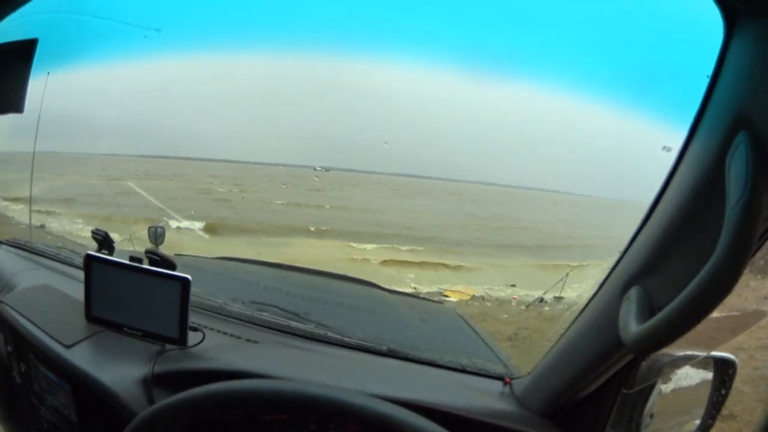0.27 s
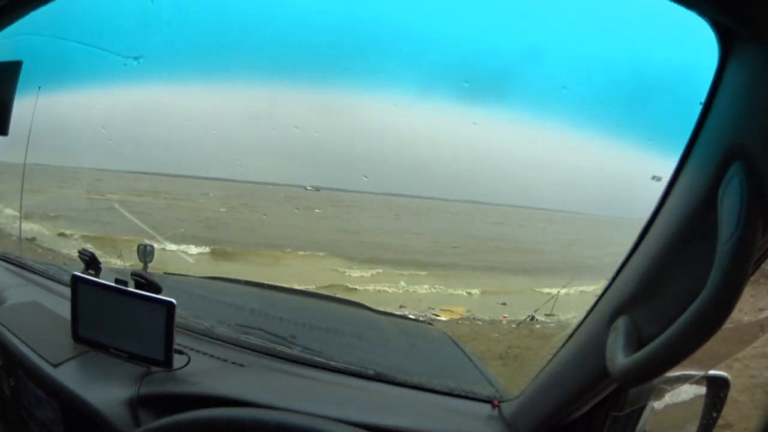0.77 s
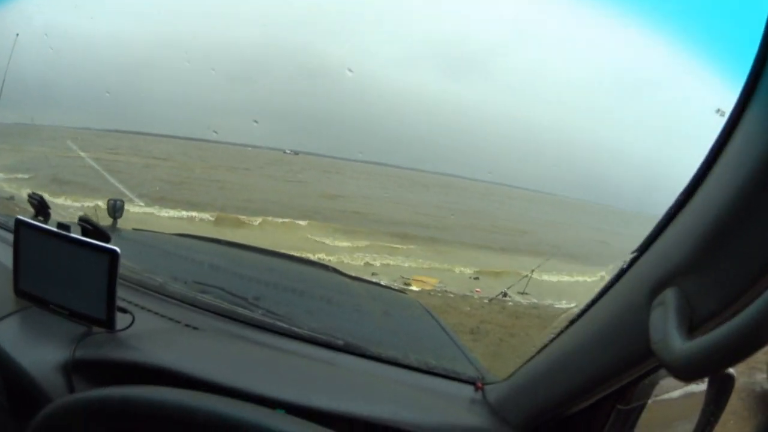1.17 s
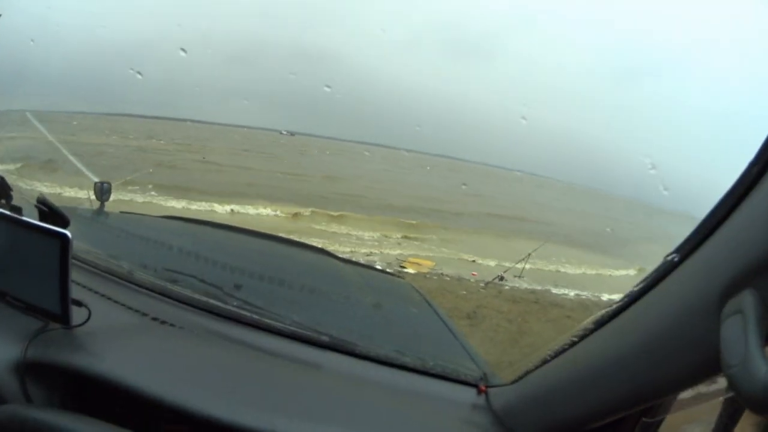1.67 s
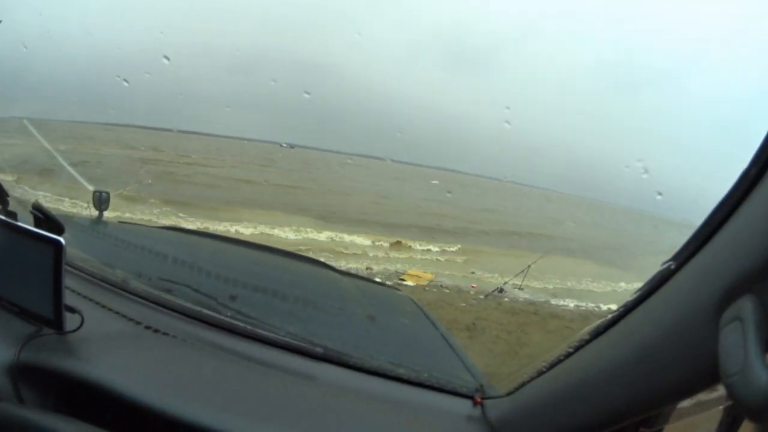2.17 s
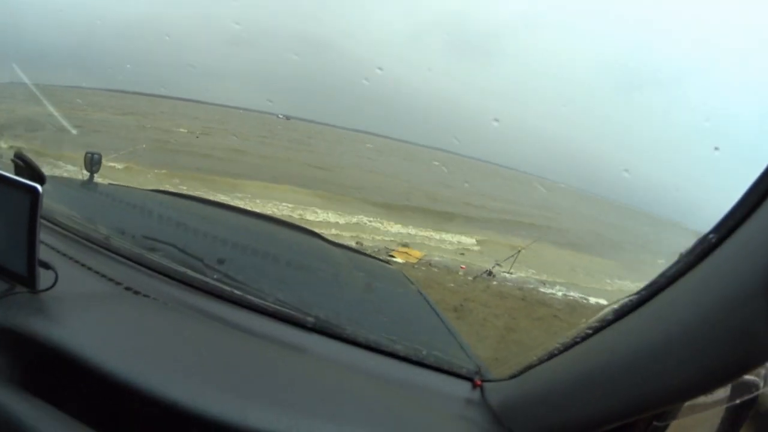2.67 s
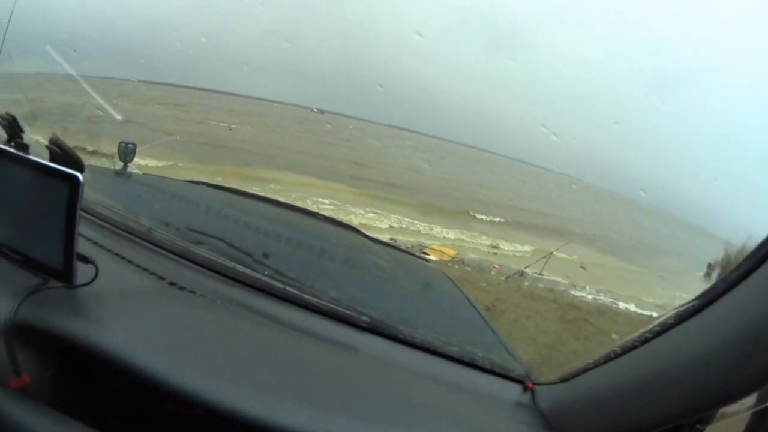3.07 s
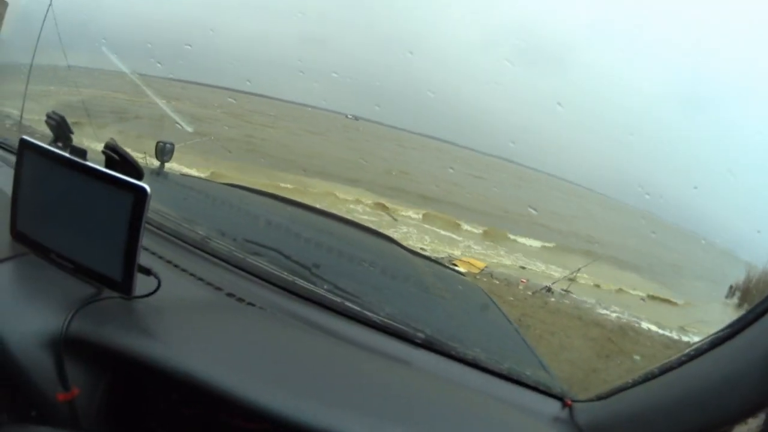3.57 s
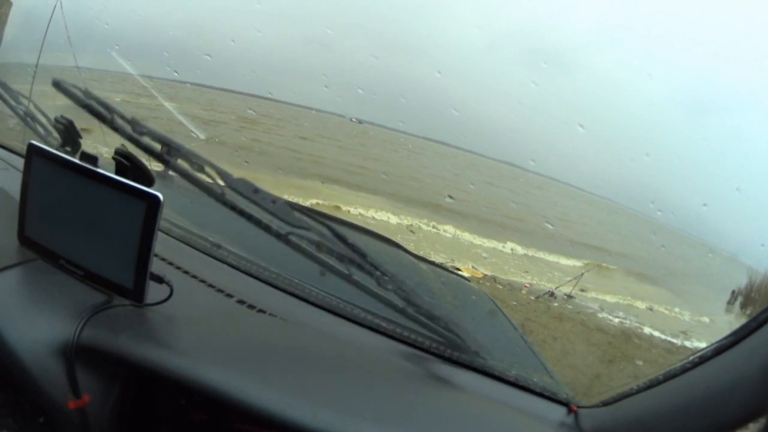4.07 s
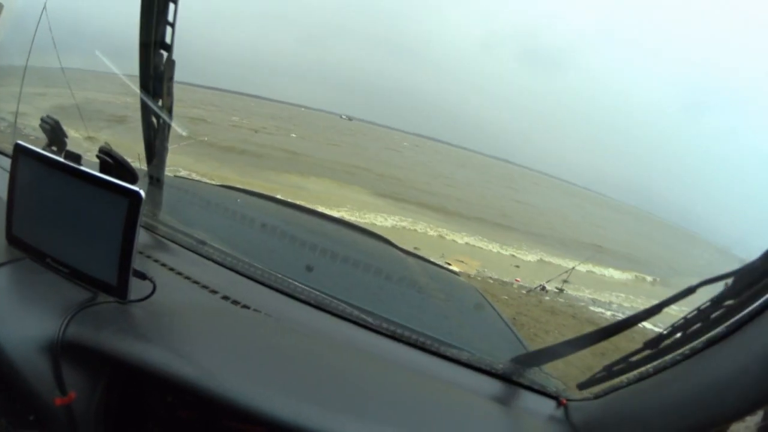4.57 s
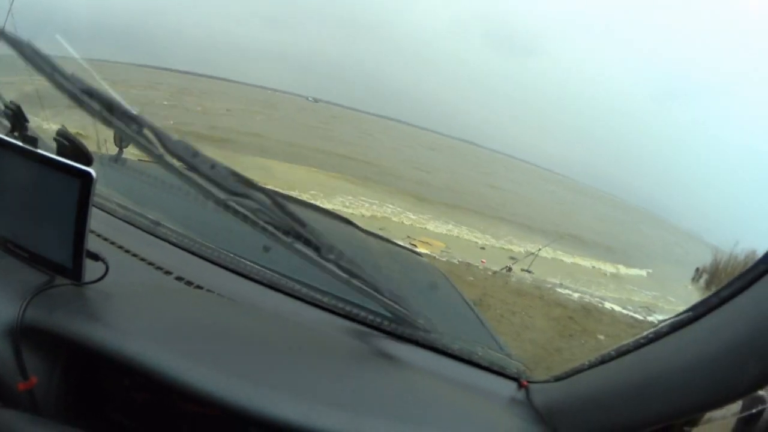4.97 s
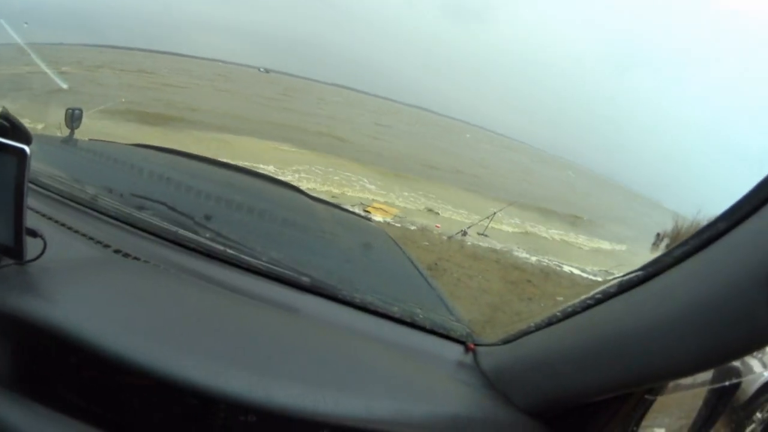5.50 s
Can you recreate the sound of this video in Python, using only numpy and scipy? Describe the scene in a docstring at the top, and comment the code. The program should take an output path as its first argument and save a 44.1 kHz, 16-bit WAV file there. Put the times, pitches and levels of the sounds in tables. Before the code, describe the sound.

Inside an idling car in wind and spray, fingers knock and rub the handheld camera before wipers swish once across and back with a hard clack.

```python
"""Idling car on a stormy shore

Heard from the driver's seat. Gusts drive spray against the glass as filtered noise and tiny impacts;
single drops tick on it as short noise bursts, over an idle of low harmonics and a booming cabin.
Fingers knock and rub on the hand-held camera, whose ringing case lies right beside the microphones.
Near the end the wipers sweep once out and back: stick-slip swishes, and struck modes that clack at the turn."""
import sys
import numpy as np
from scipy import signal
from scipy.fft import rfft, irfft
from scipy.io import wavfile
from scipy.ndimage import uniform_filter1d

SR = 44100
rng = np.random.default_rng(int(sys.argv[2]) if len(sys.argv) > 2 else 0)


def wav_out(sig):
    """Save sig, one row per channel (or a flat mono array), as 16-bit PCM at SR to the path in sys.argv[1]."""
    wavfile.write(sys.argv[1], SR, np.round(np.clip(np.atleast_2d(sig).T, -1, 1) * 32767).astype(np.int16))


N = 253134
T = np.arange(N) / SR  # time through the scene [s]
AGE = T[:SR // 4]  # time since a single blow [s]


def undb(db):
    """Decibels to gain."""
    return 10 ** (np.asarray(db) / 20)


def curves(table):
    """Each column of a timed table, interpolated at every sample."""
    s, *columns = np.transpose(table)
    return [np.interp(T, s, column) for column in columns]


def unit(x):
    """Scale to rms 1."""
    return x / np.sqrt(np.mean(x ** 2))


def colour(x, points):
    """Filter by a (frequency [Hz], level [dB]) outline; the result has rms 1."""
    hz, db = np.transpose(points)
    bins = np.maximum(np.fft.rfftfreq(N, 1 / SR), 1)
    outline_db = np.interp(np.log(bins), np.log(hz), db)
    return unit(irfft(rfft(x) * undb(outline_db), N))


def band(x, lo_hz, hi_hz):
    """Causal band-pass."""
    return signal.sosfilt(signal.butter(2, [lo_hz, hi_hz], "band", fs=SR, output="sos"), x)


def walk(rate):
    """Smoothed random wander of rms 1; rate is in new values per second."""
    k = int(SR / rate)
    steps = np.repeat(rng.standard_normal(N // k + 2), k)
    smooth = uniform_filter1d(uniform_filter1d(steps, k), k)
    return unit(smooth[:N])


def grains(rate, spread_db):
    """Two unrelated streams of tiny impacts, rate per second, a few much larger than the rest."""
    sizes = undb(spread_db * np.minimum(rng.exponential(size=(2, N)), 5))
    landed = rng.random((2, N)) < rate / SR
    return unit(landed * sizes * rng.choice([-1, 1], (2, N)))


def stereo(pair, side_db, left_db):
    """Mid and side to left and right microphones, balanced for power; left_db tilts to the left."""
    mid, side = pair[0], undb(side_db) * pair[1]
    both = np.array([mid + side, mid - side]) / np.sqrt(1 + undb(side_db) ** 2)
    return both * undb(np.array([[left_db], [-left_db]]) / 2)


def ring(modes, scatter):
    """Struck modes, neighbours in opposite sign, as mid and side; every blow is detuned a little."""
    hz, db, t60 = np.transpose(modes)[:, :, None]
    detune, lead = rng.standard_normal((2, len(modes), 1))
    sign = (-1) ** np.arange(len(modes))[:, None]
    fade = sign * undb(db - 60 * AGE / t60)
    z = fade * np.exp(2j * np.pi * hz * (1 + scatter * detune) * AGE)
    # each mode leans towards one microphone just after the onset
    side = np.sign(lead) * (1 - np.exp(-AGE * hz)) * z.real
    return np.array([z.imag.sum(0), side.sum(0)])


def add(out, s, sound, db):
    """Mix in a short sound; db is its level over 20 ms."""
    start = int(s * SR)
    sound = sound * undb(db) * np.sqrt(2 * .02 * SR / np.sum(sound ** 2))
    out[:, start:start + len(AGE)] += sound[:, :N - start]


# wind on the glass: (time [s], relative level [dB])
GUST = [(0.0, -55), (0.29, -55), (0.64, -58), (0.88, -58), (1.16, -51), (1.37, -52), (1.89, -57),
        (2.18, -57), (2.34, -56), (2.63, -51), (2.91, -53), (3.12, -52), (3.28, -50), (3.74, -50),
        (3.98, -54), (4.16, -54), (5.08, -50), (5.34, -50), (5.54, -53), (5.72, -53)]
# spray heard through the glass: (frequency [Hz], level [dB])
SPRAY = [(400, -14), (700, -4), (1050, 0.5), (1300, 11), (1550, 0.5), (1800, 4), (2200, -3), (2700, 8.5),
         (3700, -1), (4600, 0), (5400, -2), (5900, -0.5), (7000, -11), (11000, -38)]
# wind booming in the cabin: (frequency [Hz], level [dB])
BOOM = [(15, -9), (40, 3.5), (100, -3.5), (170, -3), (300, -6.5), (480, -9.5), (650, -16.5), (1200, -34)]


def storm():
    """Fine spray hisses and crackles with the gusts; the cabin booms underneath, almost steadily."""
    gust_db, = curves(GUST)
    force_db = gust_db - gust_db.mean()
    drizzle = unit(rng.standard_normal((2, N)) + 0.46 * grains(rate=1500, spread_db=2.0))
    hiss = stereo(colour(drizzle, SPRAY), side_db=-5.5, left_db=0.8)
    hiss = hiss * undb(gust_db + 6.0 + .5 * walk(14))
    mist = unit(band(grains(rate=4000, spread_db=1.5), 5650, 9850))
    mist = stereo(mist, side_db=-3, left_db=-0.5) * undb(-61 + 0.925 * force_db)
    low = colour(rng.standard_normal((2, N)), BOOM)
    low[1] = band(low[1], 354, 2200)  # the deep bass is nearly the same at both microphones
    boom = stereo(low, side_db=-3, left_db=2.0) * undb(-49 + 0.087 * force_db + 0.75 * walk(6.5))
    return hiss + mist + boom


# small drops on the glass and roof: (frequency [Hz], level [dB])
PATTER = [(1200, -22.5), (2000, -1), (2800, 5.5), (3700, 5.5), (6000, 5.5), (7500, -5.5), (11000, -16)]


def patter():
    """Small drops land at random as brief noise splashes, louder in the gusts."""
    gust_db, = curves(GUST)
    splash = rng.standard_normal((2, len(AGE))) * np.exp(-AGE / 0.0042)
    landings = grains(rate=70, spread_db=2)[0]
    ticks = colour(signal.fftconvolve(landings[None], splash, axes=1)[:, :N], PATTER)
    return stereo(ticks, side_db=-20.5, left_db=-7.0) * undb(gust_db - 4.5)


# idling engine: (multiple of the firing rate, mean level [dB])
ENGINE = [(1, -52), (2, -56), (3, -53), (4, -60.5), (5, -62), (7, -66), (12, -71), (14, -76)]
FIRING_HZ = 29.9


def engine():
    """The idle is a few harmonics of the firing rate, wandering slightly in pitch and level."""
    turns = np.cumsum(FIRING_HZ * (1 + 0.0059 * walk(4))) / SR
    hum = 0
    for k, db in ENGINE:
        line = np.sin(2 * np.pi * (k * turns + rng.random()))
        hum = hum + undb(db + 2.2 * walk(9.5)) * line
    return np.sqrt(2) * hum * undb(np.array([[.5], [-.5]]))


STROKE_RELEASE_S, STROKE_SAG_DB = 0.019, 2  # shape of every sliding contact


def stroke(start, length, attack_s):
    """A sliding contact takes hold, eases a little and dies away once it lets go."""
    age = T - start
    attack = np.clip(age / attack_s, 0, 1)
    release = np.exp(-np.maximum(age - length, 0) / STROKE_RELEASE_S)
    return attack * undb(-STROKE_SAG_DB * np.clip(age / length, 0, 1)) * release


# housing resonances that colour finger scrapes, used for the wiper swish too:
# (frequency [Hz], width [Hz], level [dB])
HOUSING = [(858, 106, -5.5), (1338, 191.3, 3.5), (1507, 174, -3), (1850, 276, -0.5), (2190, 290, -6),
           (2526, 150, -3)]


def friction(slip_hz):
    """Dense stick-slip clicks ring the resonances, most of all near the slipping pitch; rms near 1."""
    out, power = 0, 0
    for hz, width, db in HOUSING:
        gain = undb(db - 13.2 * np.abs(np.log2(hz / slip_hz)))
        clicks = grains(rate=2300, spread_db=2)
        out = out + gain * unit(band(clicks, hz - width / 2, hz + width / 2))
        power = power + gain ** 2
    return out / np.sqrt(power)


# finger strokes on the camera, beside the microphones:
# (start [s], length [s], relative level [dB], pressure [0-1], favoured pitch [Hz])
RUBS = [(0, 0.063, -51, 0, 1860), (0.701, 0.11, -60.5, 1, 1470), (0.875, 0.18, -43, 0.79, 1700),
        (1.052, 0.05, -33, 0.71, 1660), (1.13, 0.093, -53, 0.89, 1510), (1.334, 0.084, -60.5, 0.91, 1400),
        (1.861, .045, -58.5, 0.95, 1400), (2.065, 0.1, -46, 0.44, 1300), (2.165, 0.17, -52.5, 0.7, 1270),
        (2.51, 0.43, -42.5, .66, 1350), (2.722, 0.037, -42, 0.89, 1430), (2.869, 0.034, -39.5, 0.61, 1400),
        (2.969, .17, -43.5, 0.47, 1336), (3.206, 0.11, -57, 0.86, 1340), (3.424, 0.1455, -40.5, 0.14, 1360),
        (3.58, 0.42, -49, 0.12, 1510)]
# rasp of a hard-pressing finger: (frequency [Hz], level [dB])
RASP = [(100, -5), (250, -6.5), (380, -1.5), (560, 2), (720, -4), (850, 0.5), (1050, -4), (1700, -14),
        (2100, -13), (2600, -9), (3400, -26), (7000, -45)]
SKIN_ATTACK_S = 0.0066  # time to take hold
RASP_DB, RASP_PRESS_DB = -11.5, 19.5  # relative to the contact at zero pressure; gain at full pressure
RUMBLE_DB, RUMBLE_PRESS_DB = -10, 30.5  # the same for the rumble of the grip
GRAB_RATE, GRAB_DB = 60, 1.2  # skin grabs and lets go: random steps per s, spread of the rasp level


def rubbing():
    """Skin scrapes on the case; the harder it presses, the more it rasps and the grip rumbles."""
    scraping, rasping, rumbling, slip_hz = 0, 0, 0, RUBS[0][4]
    for start, length, db, pressure, hz in RUBS:
        contact = stroke(start, length, SKIN_ATTACK_S) * undb(db)
        scraping = np.hypot(scraping, contact)
        rasping = np.hypot(rasping, contact * undb(RASP_DB + RASP_PRESS_DB * pressure))
        rumbling = np.hypot(rumbling, contact * undb(RUMBLE_DB + RUMBLE_PRESS_DB * pressure ** 2))
        slip_hz = np.where(T >= start, hz, slip_hz)
    grab_db = GRAB_DB * walk(GRAB_RATE)
    scrape = friction(slip_hz) * scraping * undb(0.07 + .5 * grab_db)
    catches = grains(rate=110, spread_db=2)  # sparse, so each one stands out
    rasp = colour(grains(rate=2800, spread_db=2.0) + .5 * catches, RASP) * rasping * undb(grab_db)
    rumble = unit(band(grains(rate=700, spread_db=1.5), 64, 151)) * rumbling * undb(walk(35))
    out = stereo(scrape, side_db=-9.0, left_db=-1.0)
    out = out + stereo(rasp, side_db=-4.5, left_db=2.0)
    return out + stereo(rumble, side_db=-16.0, left_db=2.5)


def scuff(sound, ms):
    """A fingertip lands in a quick run of tiny slips; a longer run gives a more ragged attack."""
    length = ms / 1000 * SR
    age = np.arange(int(8 * length)) / length
    slips = 0.21 * rng.standard_normal(len(age)) * age * np.exp(-age)
    slips[0] = 1
    return signal.fftconvolve(sound, slips[None], axes=1)[:, :len(AGE)]


# fingers knocking on the camera, beside the microphones:
# (time [s], relative level [dB], softness [0 = nail to 1 = pad], scuff time scale [ms])
KNOCKS = [(0.54, -39.5, 1, 1.2), (0.549, -33.5, 0.47, 0.64), (0.691, -43.5, 1, 2), (0.745, -47.5, 1, 2.8),
          (0.883, -19, .95, .4), (1.022, -30.5, 0.54, 1.3), (1.027, -20.5, 0.61, 1.6),
          (1.12, -32.5, 0.33, 1.5), (1.162, -25, 0.62, 3.5), (1.172, -31, 0.733, 1.25),
          (1.276, -40.5, 0.91, .5), (1.328, -33, 0.42, 0.32), (1.401, -49, 0.55, 3.2),
          (1.905, -34.5, 0.59, 0.39), (1.913, -33.5, 0.17, 1.1), (1.918, -31, 0.89, .5),
          (1.988, -43, 0.52, 3.4), (2.008, -35.5, 0.68, 0.71), (2.504, -37.5, 0.67, 1.5),
          (2.551, -30, 0.976, 1.2), (2.679, -44.5, 0.73, 4), (2.782, -37.5, 0.7, 1.7),
          (2.873, -30, 0.775, 1.33), (3.205, -40.5, .7, 5.3), (3.42, -31, .3, 0.88),
          (4.124, -29, 0.28, 0.3), (4.43, -36, 0.28, .5), (5.436, -32.5, 0.2, 1.8), (5.481, -46, .1, 0.65),
          (5.496, -45.5, .7, 1.6)]
# modes of the camera case: (frequency [Hz], level [dB], t60 [s])
CASE = [(848, 8, 0.022), (1263, 4.5, 0.023), (1650, -5.5, 0.022)]
# modes of its dull thud in the hand: (frequency [Hz], level [dB], t60 [s])
THUD = [(47.7, -13, 0.31), (92, -4, 0.087), (168, 0, 0.035), (292, 2.5, 0.017), (543, 1.5, 0.015)]
SOFTNESS_DB = 17  # a pad rings the case this much less, a nail shoves it this much less
CRACK_DB, CRACK_DB_PER_MS = -14.5, 2.4  # added to the shove's level; a longer scuff cracks more


def knocks():
    """A nail rings the case; a finger pad shoves the whole camera, which cracks in proportion."""
    out = np.zeros((2, N))
    for s, db, softness, scuff_ms in KNOCKS:
        ring_db = db - SOFTNESS_DB * softness ** 2
        thud_db = db - SOFTNESS_DB * (1 - softness) ** 2
        case = band(scuff(ring(CASE, scatter=0.012), scuff_ms), 730, 2310)
        add(out, s, stereo(case, side_db=-8.0, left_db=.5), ring_db + 0.8)
        thud = band(ring(THUD, scatter=0.1), 44, 860)
        add(out, s, stereo(thud, side_db=-5.0, left_db=3.0), thud_db + 1.57)
        burst = rng.standard_normal((2, len(AGE))) * np.exp(-AGE / 0.0024)
        crack = band(scuff(burst, scuff_ms), 1240, 2320)
        crack_db = thud_db + CRACK_DB + CRACK_DB_PER_MS * scuff_ms
        add(out, s, stereo(crack, side_db=-4.5, left_db=2.0), crack_db)
    return out


# the larger drops on the glass: (time [s], relative level [dB], pitch [Hz])
DROPS = [(0.852, -38, 2550), (2.1285, -40.5, 2970), (2.295, -39, 2730), (2.936, -37, 2950),
         (3.051, -40, 3080), (3.2613, -32.5, 3010), (3.8358, -36.5, 3100), (3.8667, -33.5, 5250),
         (3.911, -32.5, 3280), (4.463, -33.5, 2780), (5.2313, -32.5, 4530)]


def drops():
    """Each larger drop is a short bright splat of noise with a faint fizz near 5 kHz."""
    out = np.zeros((2, N))
    for s, db, hz in DROPS:
        burst = rng.standard_normal((2, len(AGE))) * np.exp(-AGE / .004)
        splat = band(burst, 0.716 * hz, 1.373 * hz) + undb(-9.5) * band(burst, 4340, 5730)
        add(out, s, stereo(splat, side_db=-8, left_db=2.0), db - 9.5)
    return out


def swell(s, spread_s):
    """A smooth bell-shaped rise and fall around one moment."""
    return np.exp(-.5 * ((T - s) / spread_s) ** 2)


# the wiper motor strains as it starts, reverses and parks:
# (time [s], spread of the swell [s], relative level [dB])
STRAINS = [(3.956, 0.025, -44), (4.627, 0.084, -38), (5.275, 0.026, -42)]
MOTOR_DB = -48.5  # running freely, on the same relative scale


def motor():
    """The wiper motor and linkage grumble from start to park, loudest where the arms change speed."""
    on = (T > STRAINS[0][0]) & (T < STRAINS[-1][0])
    running = uniform_filter1d(1. * on, SR // 20)
    load = running * undb(MOTOR_DB) + sum(swell(s, spread_s) * undb(db) for s, spread_s, db in STRAINS)
    outline = [(50, -3), (100, 2.0), (145, 9), (210, -8), (290, -2.0), (550, -11.0), (1000, -63)]
    grumble = colour(grains(rate=720, spread_db=1.5), outline)
    return stereo(grumble, side_db=-15, left_db=1.5) * load * undb(-1.3)


def cabin(sound, wet_db, t60):
    """The dashboard and side windows throw back a short dense tail."""
    tail = rng.standard_normal((2, len(AGE))) * undb(-60 * AGE / t60)
    tail *= AGE > .002  # first return after 2 ms
    tail /= np.sqrt(np.sum(tail ** 2, axis=1, keepdims=True))
    return sound + undb(wet_db) * signal.fftconvolve(sound, tail, axes=1)[:, :len(AGE)]


# wiper arms starting, turning and parking, relative levels:
# (time [s], clack [dB], knock [dB], thump [dB], panel ring [dB])
WIPER_HITS = [(3.951, -47.5, -45.5, -44, -55), (4.395, -47, -40.5, -32, -44.5),
              (4.566, -20.5, -26, -41, -56), (4.617, -42, -39, -54, -45), (4.656, -32, -32.5, -34, -30),
              (4.7, -48, -55.5, -30.5, -42), (5.05, -67, -48, -29, -44.5), (5.263, -63.5, -49, -34.5, -45)]
# modes of the arm: (frequency [Hz], level [dB], t60 [s])
ARM = [(2250, -0.5, 0.047), (2530, 12, 0.0254), (2806, 12, 0.04), (3010, 14, 0.015), (3760, 9.5, 0.0172),
       (3860, 2, 0.021), (4250, -1, 0.027), (4850, -9, 0.062), (5180, -2.5, 0.022), (5710, -12, .03),
       (6080, -7, 0.036), (7600, -19, .012)]
# modes of the blade on the glass: (frequency [Hz], level [dB], t60 [s])
BLADE = [(732, 3.5, 0.016), (1110, 3.5, 0.0358), (1294, 8, 0.031), (1841, -4.5, 0.0454)]
# modes of the scuttle panel: (frequency [Hz], level [dB], t60 [s])
PANEL = [(99.4, -0.5, 0.12), (154, -5.5, 0.099), (535, -1.5, 0.023)]
# further ring of the same panel: (frequency [Hz], level [dB], t60 [s])
PANEL_RING = [(280.8, 6, 0.12), (399, -1, 0.13)]


def arms():
    """The wiper arms clack, slap the blade on the glass and thump the panel below."""
    out = np.zeros((2, N))
    for s, clack_db, knock_db, thump_db, ring_db in WIPER_HITS:
        clack = stereo(band(ring(ARM, scatter=0.0019), 2620, 8200), side_db=-4.5, left_db=-0.5)
        add(out, s, cabin(clack, wet_db=-4, t60=0.05), clack_db - 0.5)
        # the bare contact snaps along with the modes
        burst = rng.standard_normal((2, len(AGE))) * np.exp(-AGE / 0.0068)
        snap = band(band(burst, 4000, 5170), 2200, 8300)
        add(out, s, stereo(snap, side_db=-14, left_db=-6), clack_db - 8)
        # the blade slaps 2.1 ms later
        slap = band(ring(BLADE, scatter=0.016), 438, 2100)
        add(out, s + 0.0021, stereo(slap, side_db=-8.5, left_db=-1), knock_db - .3)
        thump = band(ring(PANEL, scatter=0.094), 57, 560)
        add(out, s, stereo(thump, side_db=-14.5, left_db=2.0), thump_db - 2.5)
        panel_ring = ring(PANEL_RING, scatter=0.0097)
        add(out, s, stereo(panel_ring, side_db=-9, left_db=1.5), ring_db)
    return out


# the rubber grips the glass:
# (start [s], length [s], relative level [dB], first pitch [Hz], last pitch [Hz])
SWISHES = [(4.167, .36, -42, 1500, 1423), (4.51, 0.32, -39, 1414, 1617), (4.811, .125, -32.5, 1425, 2000)]
# the blade skips as it slows: (time [s], level [dB])
SKIPS = [(4.972, -42.5), (5.088, -38.5), (5.116, -40), (5.136, -32.5)]
RUBBER_ATTACK_S = 0.027  # time to take hold
SWISH_CURVE = 3.2  # exponent: the pitch moves late in each swish
HUM_S, HUM_SPREAD_S, HUM_DB = 4.956, 0.12, -50  # blades humming on the drier glass of the return stroke
SQUEAL_DB, SQUEAL_JITTER = -10.5, .04  # mean level relative to the grip; relative pitch wander


def blades():
    """Rubber swishes, squeals and judders over wet glass, then hums and skips on the way back."""
    grip, slip_hz = 0, SWISHES[0][3]
    for start, length, db, first_hz, last_hz in SWISHES:
        grip = np.hypot(grip, stroke(start, length, RUBBER_ATTACK_S) * undb(db))
        glide = np.clip((T - start) / length, 0, 1) ** SWISH_CURVE
        slip_hz = np.where(T >= start, first_hz + (last_hz - first_hz) * glide, slip_hz)
    swish = friction(slip_hz) * grip * undb(-3.0)
    squeal_hz = slip_hz * (1 + SQUEAL_JITTER * walk(500))
    squeal = np.sqrt(2) * np.sin(2 * np.pi * np.cumsum(squeal_hz) / SR)
    squeal = squeal * grip * undb(SQUEAL_DB + 1.8 * walk(98))
    outline = [(150, -10.5), (350, -5), (600, 1.5), (1000, 3.5), (2000, -42)]
    judder = colour(grains(rate=1500, spread_db=1.5), outline) * grip * undb(-11.5)
    hum = unit(band(rng.standard_normal((2, N)), 464, 650)) * swell(HUM_S, HUM_SPREAD_S) * undb(HUM_DB)
    out = stereo(swish + judder + hum, side_db=-6.5, left_db=0.5) + squeal
    for s, db in SKIPS:
        skip = band(ring(BLADE, scatter=0.016), 1127, 1500)
        add(out, s, stereo(skip, side_db=-9.5, left_db=-1.0), db)
    return out


def wipers():
    """One sweep out and back."""
    return motor() + arms() + blades()


def scene():
    """Weather, idle, handling and wipers, as heard from the driver's seat."""
    return storm() + patter() + engine() + rubbing() + knocks() + drops() + wipers()


TOP_HZ = 11200


def record(dry):
    """The camera cuts the treble steeply above TOP_HZ."""
    return signal.sosfilt(signal.ellip(12, .1, 80, TOP_HZ, fs=SR, output="sos"), dry)


dry = scene()
out = record(dry)
wav_out(out)
```